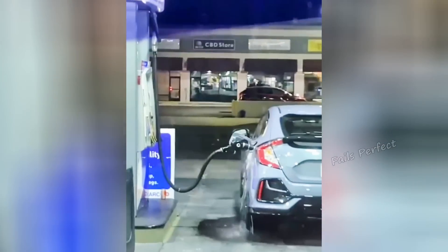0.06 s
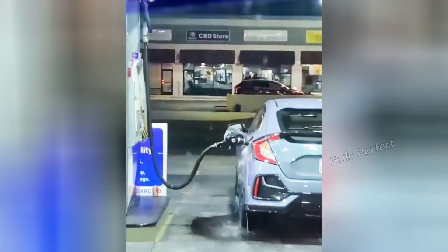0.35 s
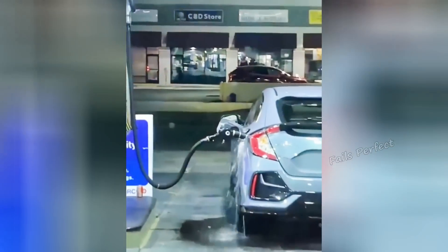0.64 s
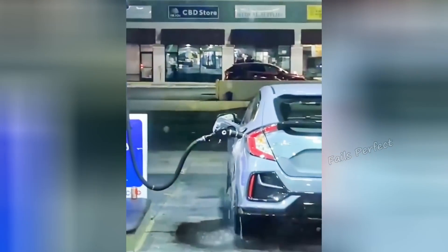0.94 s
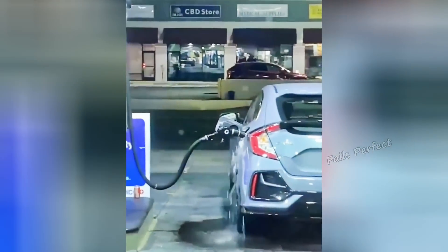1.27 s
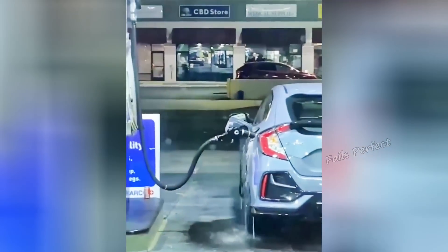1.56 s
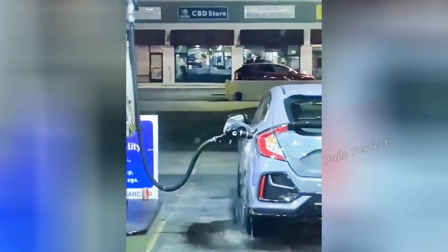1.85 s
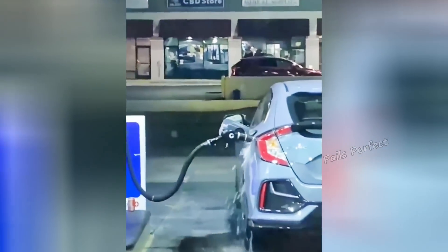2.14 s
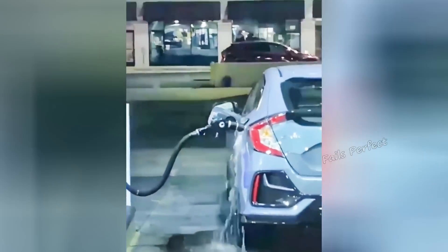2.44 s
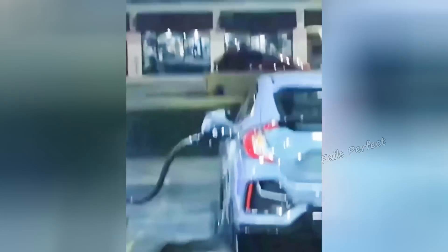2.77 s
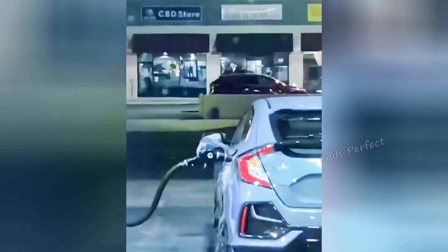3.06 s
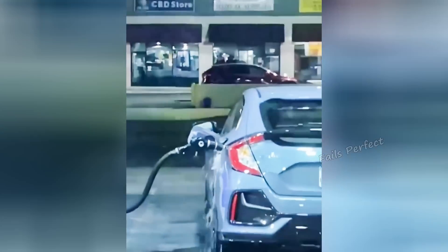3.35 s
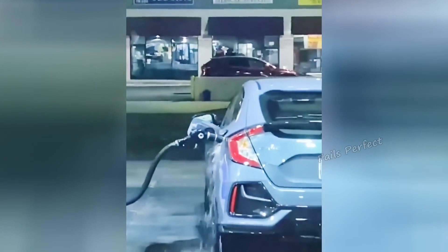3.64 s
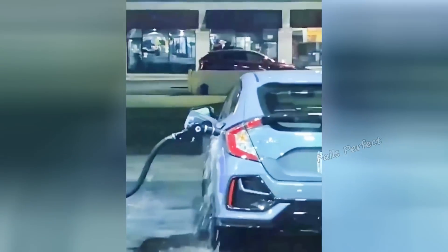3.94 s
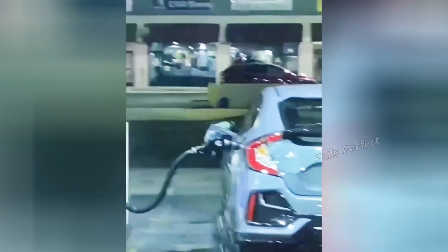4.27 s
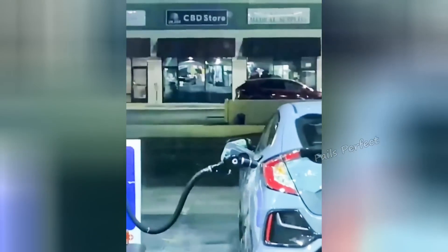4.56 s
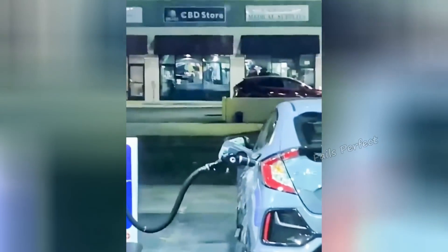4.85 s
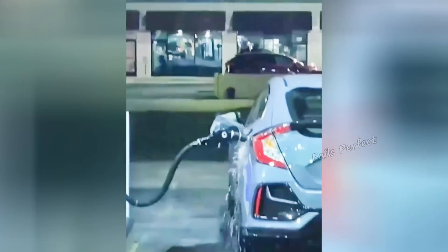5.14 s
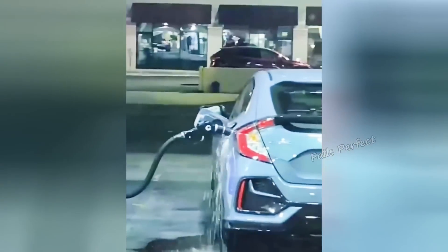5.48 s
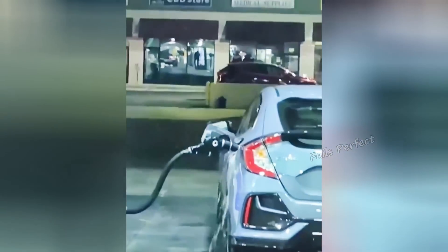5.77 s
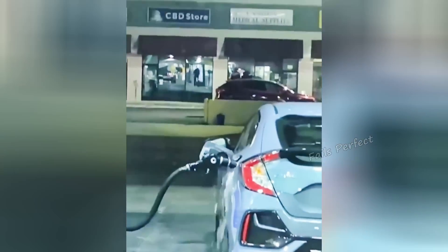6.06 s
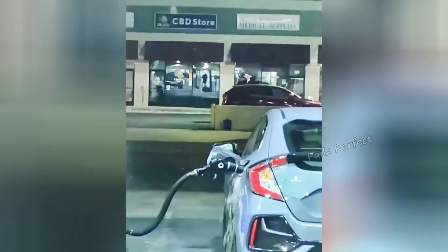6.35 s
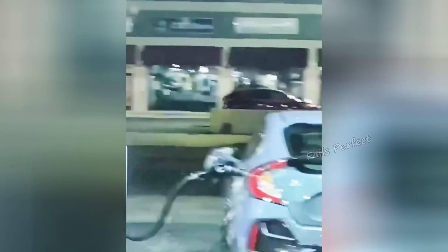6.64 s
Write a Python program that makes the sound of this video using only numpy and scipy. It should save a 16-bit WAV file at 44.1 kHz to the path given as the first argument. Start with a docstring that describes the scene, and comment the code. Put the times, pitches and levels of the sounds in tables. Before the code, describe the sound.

Liquid overflows and splatters unevenly on the ground at a filling station, with tiny bubbles and a light spray hiss.

```python
"""Fuel spilling on wet pavement

Fuel overflows from a car's filler neck at a filling station at night. The stream breaks into blobs:
each lands with a sharp slap and throws fine spray, and many trap a bubble that rings briefly.
Small drops patter between them as the spill swells and ebbs. The pavement, the car and the canopy
reflect a little of the sound, and distant traffic rumbles."""
import sys
import numpy as np
from scipy import signal
from scipy.fft import rfft, irfft
from scipy.io import wavfile

SR = 44100
rng = np.random.default_rng(int(sys.argv[2]) if len(sys.argv) > 2 else 0)


def wrap_up_sound(samples):
    """Save the sound to the file named by the first command line argument, as 16-bit audio."""
    columns = np.atleast_2d(samples).T
    # keep every value between -1 and 1, then stretch to whole-number steps
    tamed = np.clip(columns, -1, 1)
    steps = np.round(tamed * 32767).astype(np.int16)
    wavfile.write(sys.argv[1], SR, steps)


N = 295911
GRAIN_SAMPLES = 1024   # length of one slap or bubble


def from_db(db):
    """Turn decibels into a number to multiply a sound by."""
    return 10 ** (np.asarray(db) / 20)


def rms_one(x):
    """Scale a sound so its average strength (rms) is 1."""
    return x / np.sqrt(np.mean(x ** 2) + 1e-20)


def peak_one(x):
    """Scale a sound so its biggest peak is 1."""
    return x / np.abs(x).max()


def in_time(rows):
    """Join (time, value) points with straight lines, giving a value for every sample."""
    return np.interp(np.arange(N) / SR, *np.transpose(rows))


def at_hz(points, hz):
    """Read between (frequency, value) points, with octaves evenly spaced."""
    known_hz, values = np.transpose(points)
    return np.interp(np.log(hz), np.log(known_hz), values)


def butter(x, hz, kind, order=2):
    """Filter a sound, keeping its "low" part, its "high" part or a "band"."""
    sections = signal.butter(order, np.clip(hz, 10, .43 * SR), kind, fs=SR, output="sos")
    return signal.sosfilt(sections, x)


def add(track, time_s, sound):
    """Mix a stereo sound into the track at the given time."""
    start = int(np.clip(round(time_s * SR), 0, N - 1))
    track[:, start:start + sound.shape[-1]] += sound[..., :N - start]


def delayed(sound, delay_s):
    """Start a short sound later, keeping its length."""
    return np.pad(sound, (int(delay_s * SR), 0))[:len(sound)]


# How alike the background is in both ears: (frequency [Hz], likeness [0 to 1])
EAR_LIKENESS = [(25, 0.21), (60, 0.83), (140, 0.94), (280, 0.45), (600, 0.67), (2000, 0.62), (6000, 0.11),
                (13000, 0.16)]

def stereo_noise(tone):
    """Steady noise shaped by (frequency, level) points, partly alike left and right."""
    hz = np.maximum(np.arange(N // 2 + 1) * SR / N, 1)
    edge_fade = 1 / (1 + (tone[0][0] / hz) ** 4) / (1 + (hz / tone[-1][0]) ** 8)
    alike = at_hz(EAR_LIKENESS, hz)
    mid, side = rfft(rng.standard_normal((2, N)))
    pair = np.sqrt(1 + alike) * mid + np.sqrt(1 - alike) * side * [[1], [-1]]
    return rms_one(irfft(pair * edge_fade * from_db(at_hz(tone, hz)), N))


# Tone of the open air: (frequency [Hz], relative level [dB])
AIR_TONE = [(60, -11), (250, 1.5), (400, 0), (800, -9.5), (1400, -12.5), (2500, -8)]

def open_air(murmur_db=-75, flutter_db=-57):
    """The air murmurs steadily, with a very deep flutter at the microphone."""
    murmur = from_db(murmur_db) * stereo_noise(AIR_TONE)
    flutter_tone = [(7, -1), (8.5, -25), (11, 3), (16, -8), (22, -22), (30, -19.5), (50, -40)]
    return murmur + from_db(flutter_db) * stereo_noise(flutter_tone)


# How loud the traffic is: (time [s], level [dB])
TRAFFIC_LEVEL = [(0.05, -64.5), (1.1, -63), (1.9, -72.5), (3.56, -73.5), (3.67, -62), (3.7, -70),
                 (5.99, -73.5), (6.36, -68), (6.43, -76), (6.71, -74.5)]
# Tone of its rumble: (frequency [Hz], relative level [dB])
TRAFFIC_TONE = [(48, -1), (62, -5), (80, -7), (115, -4), (155, -0.5), (190, -9.5), (240, -14.5),
                (400, -21.5), (700, -27)]

def traffic():
    """Faraway engines make a low rumble that rises and falls."""
    return from_db(in_time(TRAFFIC_LEVEL)) * stereo_noise(TRAFFIC_TONE)


# How strong the spill is; mist, droplets and drops follow it: (time [s], level [dB])
SPILL_LEVEL = [(0.0, -62), (0.73, -49), (1.16, -54.5), (1.92, -49), (2.07, -47.5), (2.34, -51), (2.69, -50),
               (3.05, -58), (3.62, -56.5), (3.79, -56), (4.04, -58.5), (4.26, -46), (4.45, -47.5),
               (4.82, -57.5), (5.14, -49.5), (5.4, -59), (5.94, -56.5), (6.71, -44.5)]

def spill_db(swing):
    """The spill's level at every sample; swing 1 keeps all its ups and downs, 0 flattens them."""
    db = in_time(SPILL_LEVEL)
    return db.mean() + swing * (db - db.mean())


# Tone of the finest spray: (frequency [Hz], relative level [dB])
MIST_TONE = [(1200, -9), (2500, -9), (4000, -5.5), (7500, 5), (10000, 3), (13000, 1), (17000, -25)]

def mist(average_db=-61):
    """The finest spray blurs into a hiss that swells gently with the spill."""
    swell_db = spill_db(swing=0.32)
    return from_db(average_db + swell_db - swell_db.mean()) * stereo_noise(MIST_TONE)


def slap(hz, width_ratio=1.443):
    """Liquid hits the wet ground with one pulse of pressure, higher in pitch for a smaller blob."""
    click = signal.unit_impulse(GRAIN_SAMPLES)
    return peak_one(butter(click, [hz / width_ratio, hz * width_ratio], "band"))


def bubble(hz, fade_cycles=0.55, rise=0.012):
    """Air trapped in shallow liquid rings for only a few cycles, rising in pitch."""
    cycles = np.arange(GRAIN_SAMPLES) / SR * hz
    envelope = cycles * np.exp(-cycles / fade_cycles)
    flow = envelope * np.sin(2 * np.pi * cycles * (1 + rise * cycles))
    return peak_one(np.diff(flow, prepend=0))   # we hear the change in flow


def scatter(sound, scatter_db, early_s=0.0028, late_s=0.0034, late_db=-10, side_share=0.41):
    """The splash and nearby surfaces trail a sound with a few milliseconds of tiny echoes."""
    t = np.arange(GRAIN_SAMPLES) / SR
    mid, side = rng.standard_normal((2, GRAIN_SAMPLES))
    noise = mid + side_share * side * [[1], [-1]]
    power = np.exp(-2 * t / early_s) / early_s
    power += from_db(late_db) ** 2 * np.exp(-2 * t / late_s) / late_s
    paths = from_db(scatter_db) * np.sqrt(power / power.sum()) * noise
    paths[:, 0] = 1   # the sound that comes straight to the ear
    return signal.fftconvolve(paths, sound[None], axes=1)


def landing(slap_db, slap_hz, bubble_db, bubble_hz):
    """A blob slaps down with a faint thud; its hollow closes and a bubble rings, then a smaller one."""
    thud = from_db(-37) * slap(hz=1100, width_ratio=2.56)
    scatter_db = 1 - 0.3761 * (slap_db + 20)   # harder slaps are cleaner; -20 dB is a middling one
    hit = from_db(slap_db) * scatter(slap(slap_hz) + thud, scatter_db)
    hollow = from_db(-22) * slap(0.67 * bubble_hz, width_ratio=2.32)   # wider than the bubble, so lower
    ring = delayed(bubble(bubble_hz) + hollow, delay_s=0.0003)
    small_ring = from_db(-10) * delayed(bubble(1.84 * bubble_hz), delay_s=0.001458)
    return hit + from_db(bubble_db) * scatter(ring + small_ring, scatter_db=-8)


def droplets(per_s=150, above_spill_db=8.5, size_db=4.5, low_hz=6200, high_hz=13500, tries=3000):
    """Tiny droplets thrown up by the splashes tick at random, harder when the spill is strong."""
    out = np.zeros((2, N))
    softest_db = spill_db(swing=0.47) + above_spill_db
    for when, chance, size, pitch in rng.random((tries, 4)):
        if chance < per_s * N / SR / tries:
            start = int(when * N)
            db = softest_db[start] + size_db * min(-np.log(size), 2.5)   # most are soft, a few loud
            tick = slap(low_hz * (high_hz / low_hz) ** pitch)
            add(out, start / SR, from_db(db) * scatter(tick, scatter_db=2.5))
    return out


def drops(per_s=28, above_spill_db=22, slap_range_db=7, bubble_range_db=12):
    """The stream sheds small drops at an uneven pace; they land louder as the spill swells."""
    out = np.zeros((2, N))
    typical_db = spill_db(swing=1) + above_spill_db
    for k, (late, size, pitch, bubble_strength, bubble_pitch) in enumerate(rng.random((400, 5))):
        time_s = (k + 2 * late) / per_s
        if time_s * SR < N:
            slap_db = typical_db[int(time_s * SR)] + slap_range_db * (size - .5)
            slap_hz = 7200 * (12500 / 7200) ** pitch
            bubble_db = slap_db - 3 + bubble_range_db * (bubble_strength - .5)
            bubble_hz = 4000 * (9000 / 4000) ** bubble_pitch
            add(out, time_s, landing(slap_db, slap_hz, bubble_db, bubble_hz))
    return butter(out, 2200, "high", order=1)   # too light to push much low sound


# Each big blob landing:
# (time [s], slap level [dB], slap pitch [Hz], bubble level [dB], bubble pitch [Hz])
BLOB_LANDINGS = [(0.0545, -9, 13100, -58, 4860), (0.0746, -15, 11100.0, -30, 3350),
                 (0.1803, -28, 10700, -34.5, 3100), (0.2549, -18.5, 9400, -24.5, 4660),
                 (0.3328, -19.5, 6950, -28, 3880), (0.3769, -8, 10200, -47, 4800.0),
                 (0.4663, -13, 9200, -39.5, 2200), (0.8029, -15.5, 6900.0, -24, 2360),
                 (0.8158, -19.5, 5850, -24.5, 2620.0), (0.8933, -27.5, 5400, -24.5, 3270),
                 (0.9375, -26, 8000, -19, 3550.0), (0.9636, -20, 8150, -25, 2220),
                 (1.0674, -22, 6960, -20.5, 3680.0), (1.074, -12, 12100, -44, 4500),
                 (1.09, -20.5, 5700, -39, 2210), (1.2102, -17, 7000, -26.5, 3900),
                 (1.2878, -24, 8100.0, -30, 2850), (1.2971, -23.5, 6200, -35, 3500),
                 (1.313, -21.5, 6760, -31.5, 2600), (1.3871, -15, 8800.0, -34, 4800.0),
                 (1.4261, -13, 6600, -18.5, 3930), (1.5489, -20, 7600, -28, 4470),
                 (1.5655, -21, 6900.0, -19, 2800), (1.5985, -21.5, 8100.0, -25.5, 3530),
                 (1.6844, -11.5, 6400.0, -41, 1930.0), (1.6989, -26, 5450, -32, 2530),
                 (1.7052, -20, 6000, -36, 4200), (1.75, -21, 6600, -32, 4800.0),
                 (1.7758, -16.5, 6900.0, -41, 3030), (1.8012, -15.5, 7500.0, -24.5, 4570),
                 (1.858, -24.5, 7900, -28.5, 2970), (1.8935, -16, 6800, -31, 4840),
                 (1.9579, -19, 7500.0, -31.5, 2570), (1.9952, -4.5, 7340, -39.5, 1900),
                 (2.0477, -16, 8200, -51, 4970), (2.056, -28, 9500, -29.5, 4340),
                 (2.1499, -21, 5200, -28, 3230), (2.2188, -27, 7500, -34, 3600),
                 (2.2612, -17.0, 6700, -28, 2200), (2.315, -38, 6660, -28.5, 4450),
                 (2.3842, -18, 7600, -42, 2160), (2.422, -11.5, 7300, -17, 1820),
                 (2.4787, -19.5, 8100.0, -26.5, 3240), (2.498, -15, 9450, -46, 3820.0),
                 (2.5145, -23, 6400.0, -25, 2500), (2.6145, -21, 5900.0, -34, 2270),
                 (2.633, -31, 5500.0, -21.5, 3820.0), (2.69, -14, 6330, -26, 3670),
                 (2.7145, -24, 8800.0, -24.5, 4400), (2.81, -21.5, 8800.0, -28, 4130.0),
                 (2.8255, -16.5, 6960, -46, 4000), (2.8463, -25, 7100, -33, 4600),
                 (2.8666, -19, 7600, -28, 3530), (2.8824, -12.5, 8800.0, -23.5, 3140),
                 (2.9585, -20, 7050, -29, 3200), (3.0196, -19.5, 8800.0, -58, 4800.0),
                 (3.0325, -16.5, 8260, -26, 3570), (3.0834, -16.5, 7100, -17.5, 1970),
                 (3.1779, -16.5, 7400, -37, 4860), (3.2005, -17.5, 9250, -27, 4900),
                 (3.3219, -24, 7450, -33.5, 2840), (3.3727, -20.5, 8800.0, -34.5, 2820.0),
                 (3.4188, -11, 8300, -39.5, 2270), (3.4577, -18, 8800.0, -32, 3270),
                 (3.5283, -19.5, 8800.0, -49, 4800.0), (3.5702, -21.5, 8800.0, -30.5, 4800.0),
                 (3.7284, -18, 9600, -36, 2470), (3.9601, -29.5, 4860, -34, 3060),
                 (4.0518, -29, 6100, -22.5, 4800.0), (4.1801, -18.5, 6900.0, -45, 3050.0),
                 (4.207, -14.5, 8150, -22, 2670), (4.2571, -35, 8800, -29, 5200),
                 (4.2979, -22, 7460, -24, 2840), (4.316, -18.5, 6800, -36, 2740),
                 (4.4256, -21.5, 7650, -42, 4800.0), (4.489, -22.5, 8800.0, -26, 4850),
                 (4.504, -25, 8800.0, -34, 3820.0), (4.5379, -21, 7500.0, -28.5, 3820.0),
                 (4.5645, -13.5, 10300.0, -30, 4870), (4.6002, -15.0, 7100, -22.5, 1860.0),
                 (4.629, -29, 7700, -28.5, 2950), (4.6928, -20.5, 7400, -43, 4230),
                 (4.8575, -19, 8100.0, -31, 5000), (4.931, -48, 7100, -38, 2270),
                 (4.964, -21.5, 8800.0, -32.5, 2900), (5.0086, -19.5, 9500.0, -56, 4860),
                 (5.1104, -23, 8400, -27.5, 2780), (5.2146, -45, 8000, -16, 4920),
                 (5.2922, -20.5, 6800, -31, 3430), (5.305, -22.5, 5750, -24, 3700),
                 (5.5609, -23.5, 7500, -42, 4400), (5.6043, -25, 5230, -26, 1910),
                 (5.6266, -20, 7500.0, -42, 4750), (5.6949, -19, 7000, -34, 3430),
                 (5.718, -23.5, 5000, -49, 3300), (5.7496, -12, 6600, -12.5, 2570),
                 (5.8521, -31.5, 6600, -31.5, 3860), (6.018, -29, 4580, -35, 2700),
                 (6.0379, -19.5, 6600, -27.5, 3550), (6.1507, -12, 12800, -33, 4800.0),
                 (6.18, -17.5, 7760, -25, 2300), (6.2349, -20.5, 8100.0, -30, 2900),
                 (6.2467, -27, 5370, -28.5, 3260), (6.2835, -20.0, 7000, -32, 4100),
                 (6.3347, -28, 6070, -27, 2070), (6.3443, -22, 9700, -38, 4200),
                 (6.3538, -14, 7000, -11.5, 3600), (6.4342, -20, 5450, -29.5, 2950),
                 (6.4588, -17, 8000, -16.5, 4860), (6.522, -21, 9500.0, -24, 4840),
                 (6.5413, -11, 7040, -19, 4130.0), (6.565, -35, 7300, -44, 5500),
                 (6.6136, -23.0, 8100.0, -40.5, 2300), (6.671, -24.5, 6700, -30, 2900)]

def blobs(slap_trim_db=-0.8, bubble_trim_db=-0.62):
    """The stream breaks into big blobs that hit the pavement one by one."""
    out = np.zeros((2, N))
    for time_s, slap_db, slap_hz, bubble_db, bubble_hz in BLOB_LANDINGS:
        add(out, time_s, landing(slap_db + slap_trim_db, slap_hz, bubble_db + bubble_trim_db, bubble_hz))
    return out


def ground_bounce(sound, delay_s=0.001266, bounce_db=-8, dull_hz=2800, lean_left=0.23):
    """The pavement throws back a close, dull copy, and the lower notes lean to the left."""
    dull = butter(sound, dull_hz, "low", order=1)
    out = sound + lean_left * dull * [[1], [-1]]
    add(out, delay_s, from_db(bounce_db) * dull)
    return out


# Echoes from the car, the pump and the canopy: (delay [s], level [dB])
HARD_ECHOES = [(0.01, -25), (.0175, -40), (.0228, -34), (.0478, -31)]

def station_echoes(sound, tail_db=-22, fade_s=0.14, gap_s=0.008):
    """Hard surfaces return a few echoes, and a faint, thin tail dies away under the canopy."""
    echoes = np.zeros((2, N))
    for delay_s, db in HARD_ECHOES:
        add(echoes, delay_s, from_db(db) * sound)
    t = np.arange(SR // 2) / SR
    noise = butter(rng.standard_normal((2, len(t))), 11000, "low", order=1)
    tail = rms_one(noise * from_db(-60 * t / fade_s) * (t > gap_s)) / np.sqrt(len(t))
    echoes += from_db(tail_db) * signal.fftconvolve(sound, tail, axes=1)[:, :N]
    return butter(echoes, 2300, "high")


def scene():
    """Fuel splashes on the pavement, over the quiet sounds of the night."""
    liquid = blobs() + drops() + droplets() + 1e-18   # the tiny offset keeps the filters fast
    splash = ground_bounce(butter(liquid, 150, "high"))
    return splash + station_echoes(splash) + mist() + traffic() + open_air()


# Peaks and dips from the sound's path and the microphone: (frequency [Hz], width [Hz], gain [dB])
MIC_TONE = [(1420, 710, 4), (1930, 1200, -0.5), (2605, 75, 5.5), (3300, 240, 2.5), (4220, 216, 5.5),
            (4900, 1930, -2), (6170, 4500, -2), (8800, 1400, -3), (10060, 1530, 1.5), (10890, 1870, -4.5),
            (12600, 1000, -2)]

def record(dry, cutoff_hz=16100):
    """Small peaks and dips colour the sound, then the highest treble is cut."""
    for hz, width_hz, db in MIC_TONE:
        band = signal.lfilter(*signal.iirpeak(hz, hz / width_hz, fs=SR), dry)
        dry = dry + (from_db(db) - 1) * band
    return signal.sosfilt(signal.ellip(10, .2, 70, cutoff_hz, fs=SR, output="sos"), dry)


dry = scene()
out = record(dry)
wrap_up_sound(out)
```